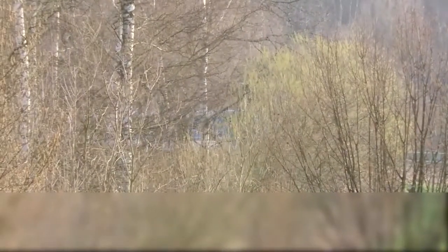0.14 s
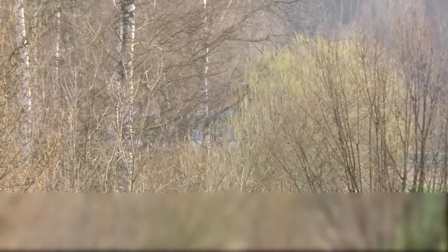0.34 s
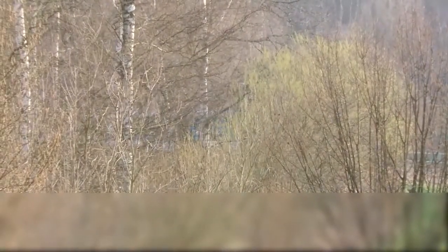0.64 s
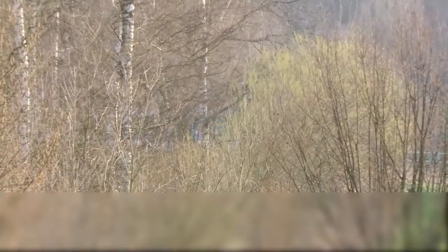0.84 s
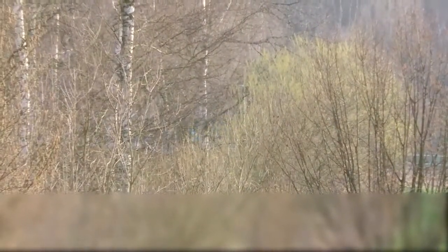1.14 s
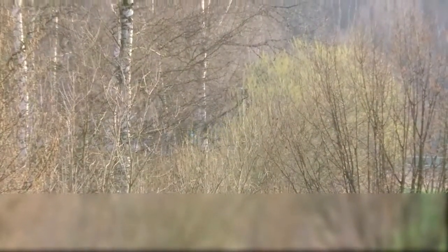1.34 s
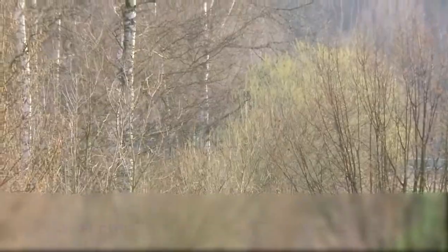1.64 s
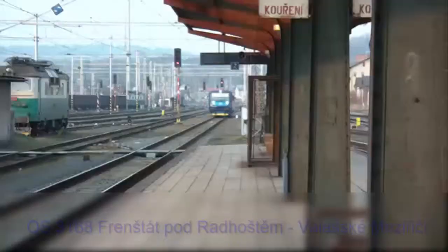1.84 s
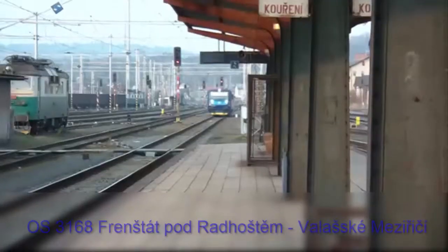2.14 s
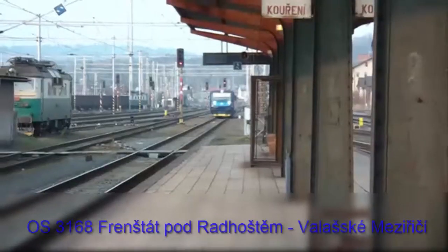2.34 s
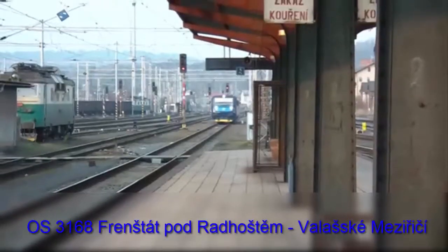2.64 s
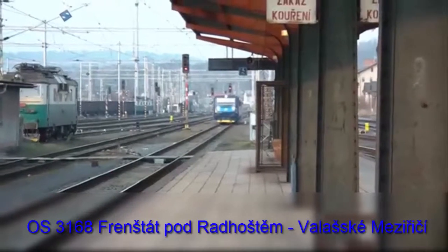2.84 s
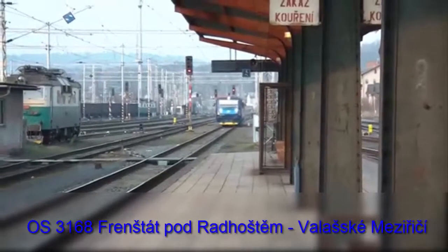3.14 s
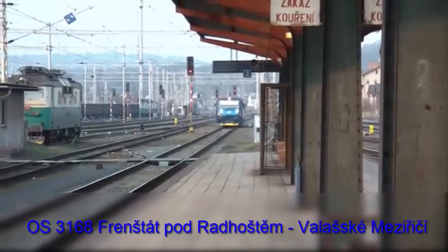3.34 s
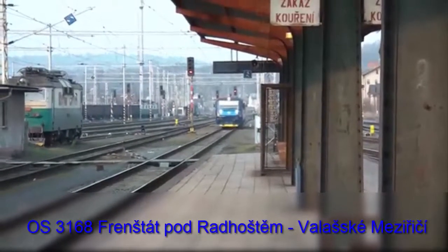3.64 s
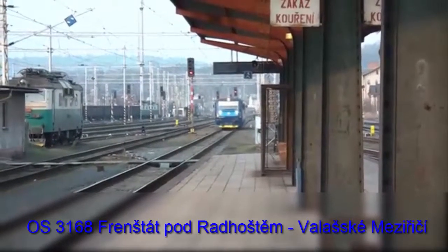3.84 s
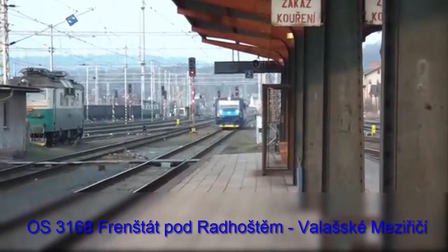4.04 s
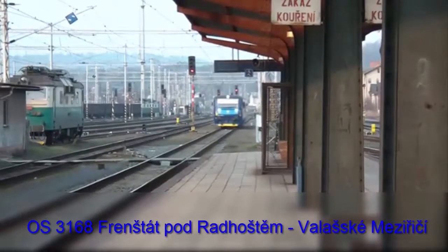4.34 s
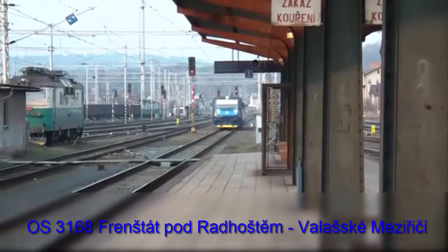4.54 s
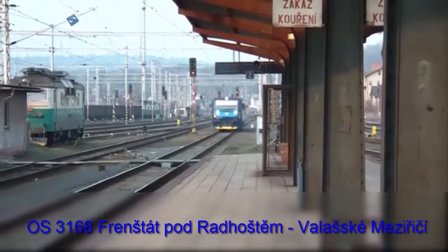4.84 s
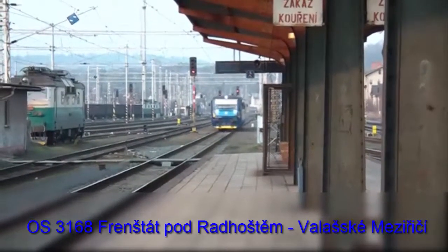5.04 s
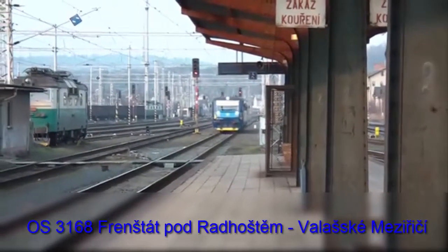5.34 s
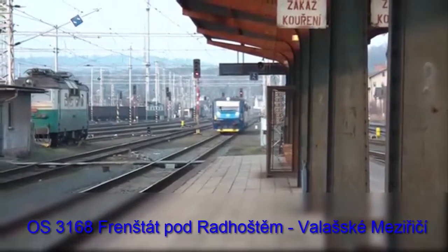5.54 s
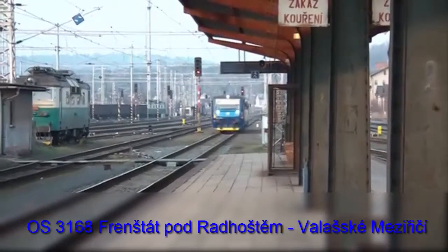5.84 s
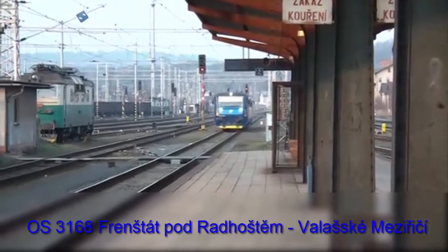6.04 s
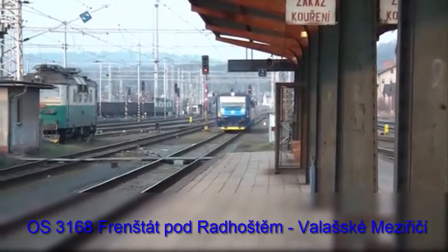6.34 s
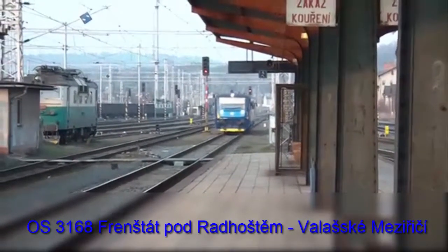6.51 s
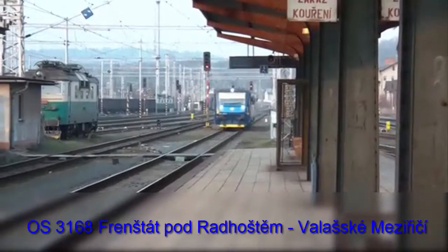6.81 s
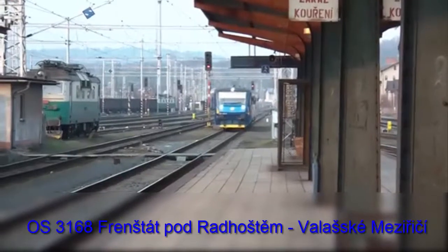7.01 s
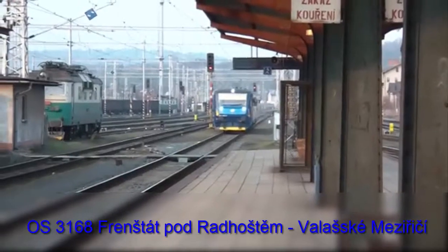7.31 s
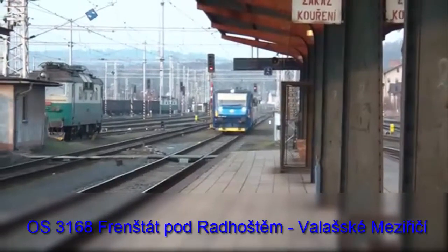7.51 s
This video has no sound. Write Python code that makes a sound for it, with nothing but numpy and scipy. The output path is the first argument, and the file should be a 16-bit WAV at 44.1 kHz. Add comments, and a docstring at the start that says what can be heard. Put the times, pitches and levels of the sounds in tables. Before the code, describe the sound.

A short, hushed stretch by a wood opens with soft air, distant thuds, faint birds and snapping twigs. Then a sudden cut brings a loud diesel engine idling near the microphone on a railway platform. It clacks and knocks in a fast, even pattern while gears whine and a loose panel rings. Behind it are another diesel's wavering hum, a very faint high whine and the slowly building rumble of a railcar drawing nearer.

```python
"""First, by a wood: quiet air, dull far-off thuds, faint birds and a few snapping twigs.
Just before 2 s the scene cuts to a station platform, where a six-cylinder diesel idles close by at
800 rpm. Its clatter, valve clacks and double knock repeat every cycle; gears whine, a panel rattles.
Behind it sit the hum of a second, slower diesel and a thin, steady whine.
Towards the end the rumble of an approaching railcar grows underneath."""
import sys
import numpy as np
from scipy import signal
from scipy.fft import rfft, irfft, next_fast_len
from scipy.io import wavfile
from scipy.ndimage import uniform_filter1d, map_coordinates

SR = 44100
rng = np.random.default_rng(int(sys.argv[2]) if len(sys.argv) > 2 else 0)


def to_wav(s):
    """Save 16-bit WAV."""
    ch = np.atleast_2d(s).T  # columns
    pcm = np.round(np.clip(ch, -1, 1) * 32767)  # PCM
    wavfile.write(sys.argv[1], SR, pcm.astype(np.int16))


N = 338247
TIME = np.arange(N) / SR
CYCLE_HZ, CYLINDERS = 6.668, 6  # one engine cycle is two turns of the crankshaft
PANEL_HZ = 686

# the near diesel's clean tones: cycle_multiple, level_db
ENGINE_ORDERS = [(6, -36), (12, -36.3), (24, -43), (51, -46.5), (54, -46.5), (60, -45), (62, -46),
                 (63, -45.5), (64, -44.5), (65, -45.5), (66, -46), (72, -47), (74, -47), (76, -45),
                 (82, -46), (90, -42), (97, -39), (104, -43.5), (108, -35.8), (112, -43), (114, -43.5),
                 (121, -41.7), (135, -42.5), (136, -43), (141, -46), (144, -44), (170, -42), (255, -47),
                 (267, -44.5), (286, -46), (306, -47)]
# its gear tones: cycle_multiple, level_db
GEAR_TONES = [(153, -45), (154, -44.5), (155, -47), (156, -41.5), (158, -44.5), (159, -39.3), (173, -47.5)]
# how hard its covers and valves rattle: time_s, gain_db
RATTLE_RIDE = [(2, -0.5), (2.68, 0.1), (2.85, -1.2), (3.05, -0.5), (3.7, -1), (4.1, -1.3), (4.4, 0),
               (5.05, -0.6), (5.5, 0.5), (5.9, -0.9), (7.2, -0.7), (7.45, 0.3)]


def amp(db):
    """Decibels to gain."""
    return 10 ** (np.asarray(db) / 20)


def unit_rms(x):
    """Scales to rms 1."""
    return x / np.sqrt(np.mean(x ** 2) + 1e-20)


def bell(x, centre, width):
    """A Gaussian bump of height 1."""
    return np.exp(-.5 * ((x - centre) / width) ** 2)


def spectrum_at(points, hz):
    """Reads a spectrum along a log-frequency axis."""
    f, value = np.transpose(points)
    return np.interp(np.log(hz + 1), np.log(f + 1), value)


def fader(rows):
    """A level ride in dB, read at every sample."""
    return np.interp(TIME, *np.transpose(rows))


def filtered(x, gain):
    """Filters by a gain that is a function of frequency."""
    size = next_fast_len(N + 4096)
    return irfft(rfft(x, size) * gain(np.fft.rfftfreq(size, 1 / SR)), size)[:N]


def eq(x, colour):
    """Filters by a curve in dB."""
    return filtered(x, lambda hz: amp(spectrum_at(colour, hz)))


def noise(colour):
    """Noise of rms 1 with the given spectrum."""
    return unit_rms(eq(rng.standard_normal(N), colour))


def drift(rate_hz):
    """A slow random wander of rms 1, no faster than rate_hz."""
    t = np.linspace(0, N / SR, 800)
    f = rate_hz * np.geomspace(1 / 10, 1, num=16)[:, None]
    waves = np.sin(2 * np.pi * (f * t + rng.random(f.shape))) / np.sqrt(f)
    return np.interp(TIME, t, unit_rms(waves.sum(0)))


def stereo(x, width):
    """Scattered reflections reach left and right differently."""
    t = TIME[:16384]
    scatter = rfft(rng.standard_normal(len(t)) * np.exp(-t / .07))
    echo = signal.oaconvolve(x, irfft(np.exp(1j * np.angle(scatter))))[:N]
    side = eq(echo, width)
    return np.array([x + side, x - side])


def tones(cycles, orders, gain_db, waver_db, waver_turns):
    """Clean multiples of an engine's cycle rate; each wavers slightly on its way through the air."""
    out = np.zeros(N)
    for multiple, db in orders:
        phase = np.round(multiple) * cycles + rng.random() + waver_turns * drift(1.97)
        out += amp(gain_db + db + waver_db * drift(4)) * unit_rms(np.sin(2 * np.pi * phase))
    return out


def strikes(cycles, rows, uneven_db, slop_ms):
    """Each blow rings near the same crank angle: harder or softer, earlier or later each cycle."""
    cycle_ms = 1000 / CYCLE_HZ
    out = np.zeros(N)
    for start_ms, hz, ring_ms, db in rows:
        since = cycles - start_ms / cycle_ms
        stroke = np.floor(since).astype(int)
        harder, later = rng.standard_normal((2, 128))[:, stroke % 128]
        age_ms = np.maximum((since - stroke) * cycle_ms - slop_ms * later, 0)
        envelope = age_ms / ring_ms * np.exp(1 - age_ms / ring_ms)
        out += amp(db + uneven_db * harder) * envelope * np.sin(2 * np.pi * hz * age_ms / 1000)
    return out


def air():
    """A quiet, almost steady bed of outdoor air."""
    # its colour: freq_hz, level_db
    colour = [(8, -1), (20, 4), (55, -9), (108, -11.5), (229, -10), (357, -3), (603, -3), (1110, -8),
              (1350, -14), (1930, -13.5), (2200, -17.5), (3100, -19), (4080, -25), (15000, -29)]
    return amp(-62 + 0.16 * drift(8.3)) * noise(colour)


def far_thuds():
    """Short, dull swells of noise in the distance."""
    # each thud: peak_s, level_db, half_length_s
    hits = [(.13, -61, 0.017), (.17, -67, .02), (0.304, -61, 0.024), (0.883, -64, .008),
            (0.977, -59.5, 0.01), (1.06, -61, 0.014), (1.142, -57.5, .028), (1.29, -55, 0.021),
            (1.548, -56.5, 0.011), (1.728, -59, .02)]
    # their colour: freq_hz, level_db
    colour = [(60, -25), (150, -13), (300, 0.5), (600, 1), (1100, -6), (1600, -19), (3000, -23),
              (6000, -45)]
    return sum(amp(db) * bell(TIME, s, half) for s, db, half in hits) * noise(colour)


def birds(settle_s=0.015, echo_t60_s=.8):
    """Whistles that slide to a held pitch and echo among the trees; high notes quaver most."""
    # the calls: start_s, length_s, first_hz, last_hz, level_db, swell_db
    notes = [(.25, .06, 6300, 3450, -76, -1), (.42, .05, 7650, 7900, -80, -1),
             (.475, .07, 2720, 2620, -80, -1), (.482, .04, 1480, 1060, -66, -1),
             (.578, .03, 5300, 4300, -82, -1), (.595, .08, 3880, 3880, -77.5, -7),
             (.588, .03, 7950, 7750, -77, -1), (.648, .035, 1520, 1050, -66, -1),
             (.655, .18, 2350, 1990, -72, 6), (.855, .085, 7100, 7500, -81, -1),
             (.955, .15, 2640, 2590, -77.5, -1), (.97, .06, 4600, 4450, -85, -1),
             (1.005, .045, 6950, 7100, -80, -1), (1.133, .045, 3130, 3090, -77.5, -1),
             (1.135, .035, 1980, 1990, -74, -1), (1.16, .09, 8350, 7700, -79.5, -1),
             (1.21, .2, 1930, 1980, -77.5, -5), (1.28, .05, 4600, 4450, -85, -1),
             (1.51, .07, 6950, 7100, -85, -1), (1.82, .016, 2400, 1800, -74, -1)]
    # tree echo, strongest for the distant high calls: freq_hz, gain_db
    echo_colour = [(1000, -5), (2000, -9), (3500, -5), (7000, 0)]
    out = np.zeros(N)
    for start_s, length_s, first_hz, last_hz, db, swell_db in notes:
        t = np.arange(round(length_s * SR)) / SR
        start = round(start_s * SR)
        jitter = unit_rms(uniform_filter1d(rng.standard_normal(SR), size=100))[:len(t)]
        quaver = 1 + .00025 * (last_hz / 1000) ** 2 * jitter
        hz = (last_hz + (first_hz - last_hz) * np.exp(-t / settle_s)) * quaver
        envelope = signal.windows.tukey(len(t), .12) * amp(swell_db * t / length_s)
        whistle = np.sin(2 * np.pi * np.cumsum(hz) / SR)
        out[start:start + len(t)] += amp(db) * unit_rms(whistle * envelope)
    trees = rng.standard_normal(SR) * amp(-60 * TIME[:SR] / echo_t60_s)
    echo = signal.oaconvolve(out, trees / np.linalg.norm(trees))[:N]
    return out + eq(echo, echo_colour)


def twigs():
    """Twigs snap in tiny bursts of bright noise."""
    # each snap: start_s, level_db, decay_s
    snaps = [(.46, -68, .002), (1.471, -59, .002), (1.826, -67, .002)]
    # their colour: freq_hz, level_db
    colour = [(1000, -30), (3400, -12), (4000, 0), (4800, -7), (8500, 0), (12000, -20)]
    envelope = sum(amp(db) * (TIME > s) * np.exp(-abs(TIME - s) / decay) for s, db, decay in snaps)
    return envelope * noise(colour)


def thin_whine():
    """Faint, steady tones high above the engines."""
    # each tone: pitch_hz, level_db
    partials = [(9001, -68), (12209, -76), (13028, -74)]
    return sum(amp(db) * unit_rms(np.sin(2 * np.pi * hz * TIME)) for hz, db in partials)


def railcar():
    """Rumble that grows as the railcar nears and surges over uneven track."""
    # its level ride: time_s, level_db
    approach = [(2, -46), (3.3, -38), (3.85, -41), (4.3, -34), (4.7, -33.5), (5.05, -33), (5.2, -33.5),
                (5.45, -37), (5.65, -36), (5.9, -36.5), (6.35, -32.5), (6.7, -30.5), (7.2, -31),
                (7.67, -36)]
    # its colour: freq_hz, level_db
    colour = [(25, -29), (55, -12), (68, -6), (76, -4), (90, -11), (160, -7.5), (260, -24), (700, -24),
              (1050, -23), (1400, -16.5), (2200, -30), (6000, -64)]
    return amp(fader(approach)) * noise(colour)


def slower_diesel(cycle_hz=6.006, hum_order=12):
    """A second engine behind the first: wavering tones over a deep hum that swells and sinks."""
    # its tones: cycle_multiple, level_db
    orders = [(18, -47), (24, -49), (36, -48), (54, -48), (60, -48), (66, -46.5), (72, -46.5), (84, -41.5),
              (114, -45), (117, -43.5)]
    # the hum's level ride: time_s, level_db
    hum_ride = [(2, -41), (2.5, -48), (3.15, -34.5), (3.5, -42), (3.9, -45), (4.25, -29.5), (4.65, -52),
                (4.95, -37.5), (5.4, -36), (5.65, -31), (5.95, -40), (6.2, -34.5), (6.6, -44),
                (7.35, -32.5), (7.67, -36)]
    cycles = cycle_hz * TIME
    hum = amp(fader(hum_ride)) * unit_rms(np.sin(2 * np.pi * hum_order * cycles))
    return hum + tones(cycles, orders, gain_db=0.5, waver_db=1.9, waver_turns=0.054)


def gears(cycles):
    """Meshing gears whine in a tight cluster of tones."""
    # how the whine swells: time_s, gain_db
    swell = [(2, -2), (2.55, -3.5), (2.85, -1.5), (4.5, -4), (6.1, -1.5), (7, 1.5), (7.67, .5)]
    return amp(fader(swell)) * tones(cycles, GEAR_TONES, gain_db=2.0, waver_db=1.5, waver_turns=0.014)


def loose_panel(cycles, ring_ms=4.5):
    """Light blows shake a loose panel, which rings at one pitch."""
    # blows within a cycle: start_ms, level_db
    taps = [(6, -34), (23, -28), (39, -31), (54, -31), (63, -29), (113, -32), (120, -32), (132, -24.5)]
    # how hard it is shaken: time_s, gain_db
    shake = [(2, -1.5), (3.1, 2.5), (3.3, -6), (4.6, -5), (5.3, 3.5), (6.4, 3.5), (7.05, 3), (7.3, -5),
             (7.67, -5)]
    blows = [(ms, PANEL_HZ, ring_ms, db) for ms, db in taps]
    return amp(fader(shake)) * strikes(cycles, blows, uneven_db=1.3, slop_ms=.06)


def valves(cycles, gain_db=-4.0):
    """Valves and injectors clack in a fixed pattern."""
    # clacks within a cycle: start_ms, pitch_hz, ring_ms, level_db
    clacks = [(4, 1000, 1.1, -23), (10.5, 2240, 2.2, -27), (13.5, 3600, 1.1, -29), (24, 920, .7, -19),
              (24.5, 2000, 2.2, -28), (32, 1430, 1.3, -26), (40, 1840, .7, -23), (44.5, 2300, .9, -21.5),
              (51.5, 920, 1.6, -22), (55, 1840, 1.2, -22.5), (61, 1000, 2.2, -24.5), (63.5, 2240, 1.6, -27),
              (69, 1920, 1.1, -25), (75.5, 2080, 1.1, -26.5), (82.5, 920, 2.2, -23), (93, 3650, 1.3, -29),
              (101.5, 4600, 1.1, -31), (106.5, 1160, 1.6, -23), (113, 2520, 1.6, -24.5),
              (116, 1760, .7, -25), (127, 1960, 1.7, -21.5), (140.5, 1240, 1.1, -25)]
    return amp(gain_db + fader(RATTLE_RIDE)) * strikes(cycles, clacks, uneven_db=2.2, slop_ms=.02)


def double_knock(cycles):
    """Two hard blows in quick succession, once a cycle."""
    # the pair: start_ms, pitch_hz, ring_ms, level_db
    blows = [(90.25, 686, 2.5, -20), (97.55, 686, 2.5, -19.5)]
    return strikes(cycles, blows, uneven_db=1.0, slop_ms=.03)


def clatter(cycles, level_db=-23, firing_depth=0.023, shimmer_db=0.58, patchy_db=5.0):
    """Gears and valves strike alike in every cycle; combustion hiss is fresh each time."""
    # the engine block's colour: freq_hz, level_db
    block = [(15, -35), (40, -0.5), (150, -5.5), (250, -5.5), (330, -4), (420, -4.5), (580, -4.5),
             (690, -2.5), (750, -5.5), (850, -3), (1060, -5), (1550, -12), (1950, -6.5), (2500, -10.5),
             (2700, -13.5), (3250, -16.5), (3620, -8), (4250, -16.5), (4750, -15.5), (5250, -19.5),
             (5900, -28), (6600, -32.5), (11300, -38), (11900, -46), (15000, -49)]
    # how much of the clatter repeats: freq_hz, power_share
    repeats = [(60, 0.03), (300, 0.3), (600, 0.48), (1000, 0.6), (2000, 0.64), (2600, 0.62), (3600, 0.22),
               (5200, 0.22), (7000, 0.08)]
    # how its bright ring comes and goes: time_s, gain_db
    bright_ride = [(2, -2.5), (2.42, -1), (2.65, 1), (3.25, -1.2), (4.12, 0.5), (4.35, -1), (4.93, -1.6),
                   (5.07, 1.5), (5.5, -2.3), (6.1, 0.2), (7.1, -0.2), (7.67, -1.5)]
    count = round(SR / CYCLE_HZ / 2)
    partials = np.exp(2j * np.pi * rng.random(count)) * amp(patchy_db * rng.uniform(-1.2, 1, count))
    partials[[round(k) for k, _ in ENGINE_ORDERS + GEAR_TONES]] = 0  # room for the clean tones
    partials[abs(np.arange(count) * CYCLE_HZ - PANEL_HZ) < 30] = 0  # room for the panel
    loop = unit_rms(irfft(partials))
    position = (cycles + 0.0002 * drift(9)) % 1  # follows the crankshaft with a little slack
    looped = map_coordinates(loop, [position * len(loop)], order=3, mode="grid-wrap")
    share = lambda hz: np.clip(spectrum_at(repeats, hz), 0, 1)
    metal = filtered(looped, lambda hz: np.sqrt(share(hz)))
    hiss = filtered(rng.standard_normal(N), lambda hz: np.sqrt(1 - share(hz)))
    throb = 1 + firing_depth * np.cos(2 * np.pi * CYLINDERS * cycles)
    body = unit_rms(eq((metal + hiss) * throb, block))
    # the covers rattle near 2150 Hz and ease off around the knock, 92 ms into each cycle
    lull_db = -1.5 * bell(cycles % 1 * 1000 / CYCLE_HZ, 92, 12)
    covers = (amp(fader(RATTLE_RIDE) + lull_db) - 1) * filtered(body, lambda hz: bell(hz, 2150, 450))
    bright = (amp(fader(bright_ride)) - 1) * filtered(body, lambda hz: bell(hz, 3800, 340))
    return amp(level_db + shimmer_db * drift(5)) * (body + covers + bright)


def near_diesel(cycle_zero_s=2.0):
    """One crankshaft drives every part; the governor lets it run slightly ahead and behind."""
    cycles = CYCLE_HZ * (TIME - cycle_zero_s) + 0.0012 * drift(0.705)
    mechanics = double_knock(cycles) + loose_panel(cycles) + valves(cycles) + clatter(cycles)
    drone = tones(cycles, ENGINE_ORDERS, gain_db=-0.63, waver_db=0.96, waver_turns=0.013)
    return mechanics + drone + gears(cycles)


def scene(wood_ends_s=1.884, station_starts_s=1.951):
    """The wood, a moment of silence, then the station."""
    # stereo width by the wood: freq_hz, side_minus_mid_db
    wood_width = [(60, 2), (180, -8), (540, -20), (1640, -12), (4930, -1.5), (14800, 0)]
    # stereo width on the platform: freq_hz, side_minus_mid_db
    station_width = [(30, -30), (80, -26), (170, -42), (350, -53), (700, -25.5), (1400, -14), (2800, -13),
                     (5000, -10), (7000, 2), (9500, -15), (13000, -4.5)]
    wood = stereo(air() + far_thuds() + birds() + twigs(), wood_width)
    station = stereo(near_diesel() + slower_diesel() + railcar() + thin_whine(), station_width)
    fade_out = np.clip((wood_ends_s - TIME) / .004, 0, 1)
    fade_in = np.clip((TIME - station_starts_s) / 0.0077, 0, 1)
    return fade_out * wood + fade_in * station


def record(dry, cutoff_hz=15150):
    """A steep low-pass trims the very top."""
    lowpass = signal.firwin(511, cutoff_hz, window=("kaiser", 9), fs=SR)
    return signal.oaconvolve(dry, lowpass[None], "same")


dry = scene()
out = record(dry)
to_wav(out)
```